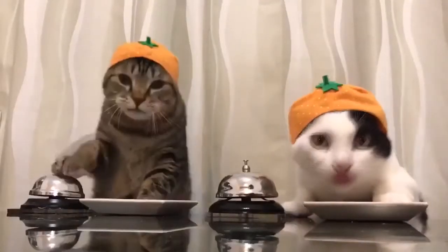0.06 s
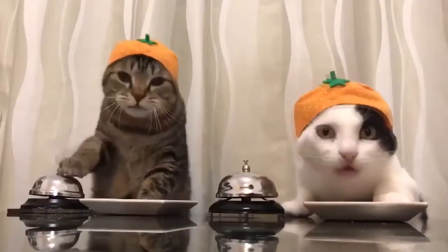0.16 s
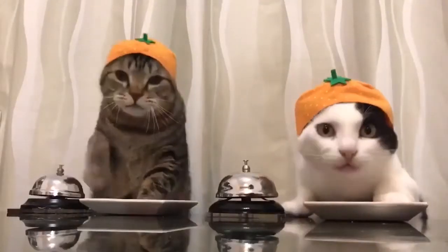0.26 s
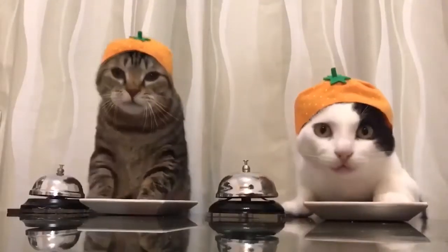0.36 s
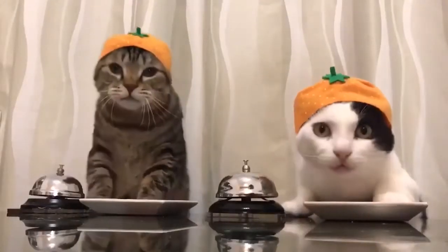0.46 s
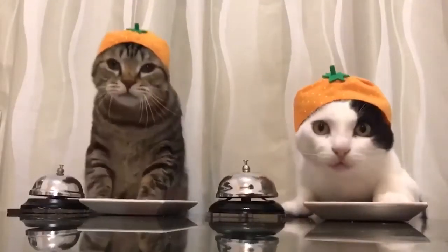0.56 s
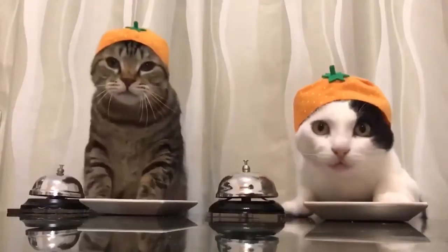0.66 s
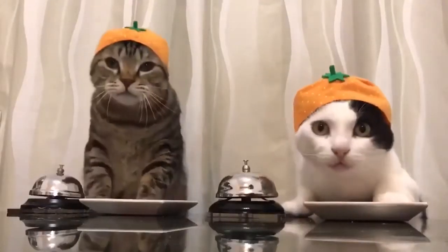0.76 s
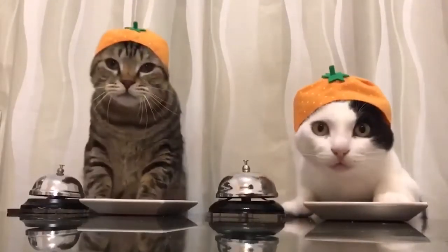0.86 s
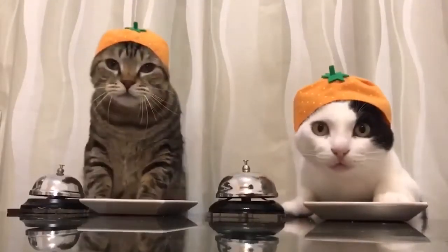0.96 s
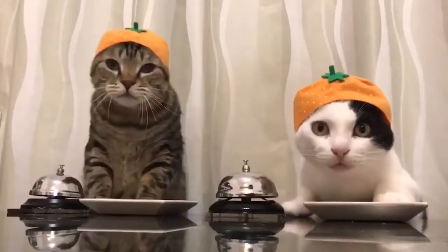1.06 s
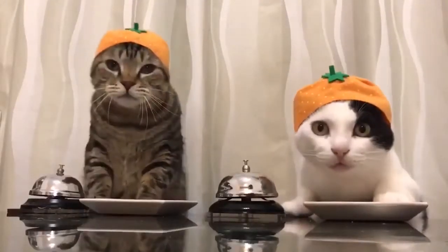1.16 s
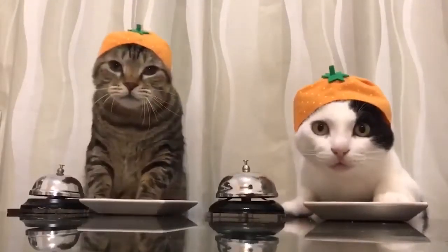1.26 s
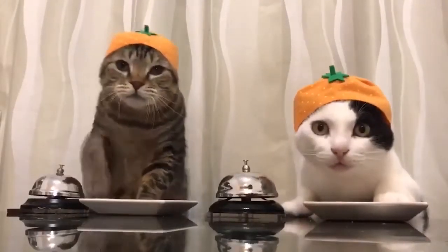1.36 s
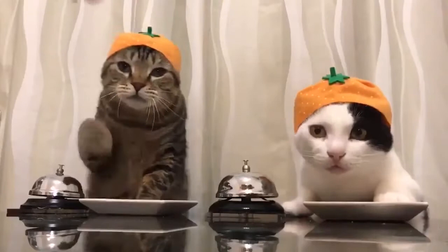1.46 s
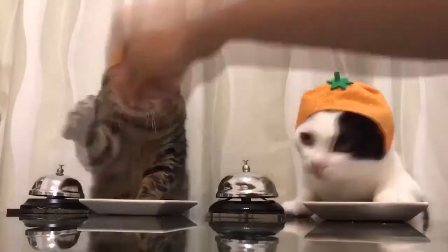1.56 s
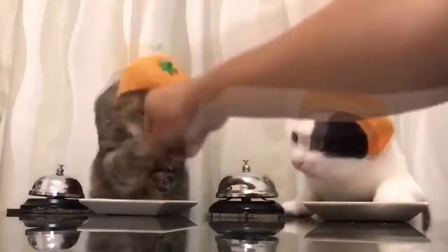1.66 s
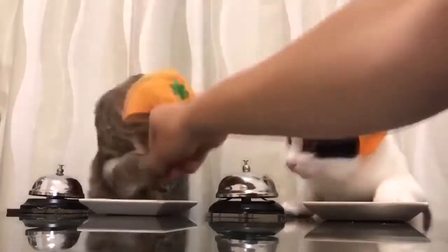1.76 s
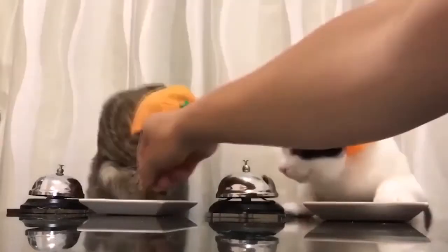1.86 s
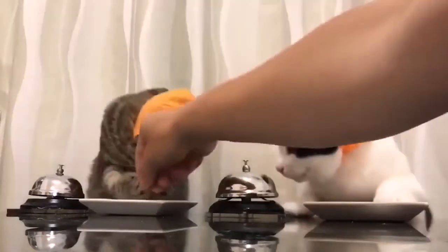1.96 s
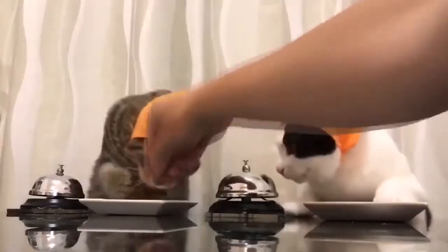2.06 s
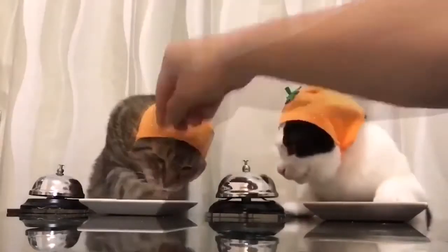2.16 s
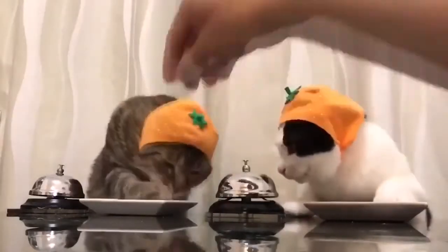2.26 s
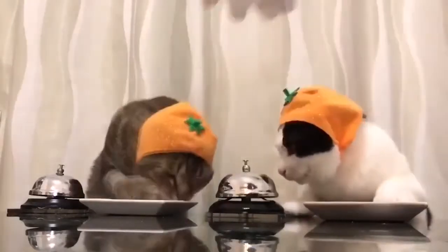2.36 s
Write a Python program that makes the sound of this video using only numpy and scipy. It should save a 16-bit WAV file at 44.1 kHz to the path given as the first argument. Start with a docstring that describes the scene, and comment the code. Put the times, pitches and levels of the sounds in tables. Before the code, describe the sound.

A metal desk bell dings twice under a fumbling paw, then dry pellets tick on china

```python
"""Paw on a desk bell

A paw fumbles at the plunger of a metal desk bell on a table: noise grains ring plunger and base, thuds the table.
The clapper strikes twice, the second blow softer: grains crack on the dome, decaying sines ring in beating pairs.
Later a few dry pellets tick on a china plate and ring its short modes, among soft scuffs of filtered noise.
A quiet room of wavering noise bands lies below.
The sound sits almost wholly in the right channel; the left is nearly silent.
"""
import sys
import numpy as np
from scipy import signal
from scipy.io import wavfile

SR = 44100
rng = np.random.default_rng(int(sys.argv[2]) if len(sys.argv) > 2 else 0)


def waveform_to_disk(signal):
    """Save audio, clipped to [-1, 1], as 16-bit WAV at the path in sys.argv[1]."""
    frames = np.transpose(np.atleast_2d(signal))
    scaled = np.clip(frames, -1, 1) * 32767
    samples = np.round(scaled).astype(np.int16)
    wavfile.write(sys.argv[1], SR, samples)


def to_linear_factor(level_db):
    """Convert decibel levels (scalar or array-like) to linear amplitude factors."""
    exponent = np.asarray(level_db, float) / 20
    return 10 ** exponent


N = 105840  # length of the scene [samples]
TOUCH_SCATTER_DB = 2  # spread of mode strengths from strike to strike

# room tone spectrum: (frequency [Hz], relative density [dB per Hz])
ROOM_SPECTRUM = [(22, -18), (40, 2), (75, 5), (130, -5.5), (300, -11.5), (800, -15.5), (2000, -24.5),
                 (4500, -44), (9000, -37), (16000, -44.5)]
# paw weight thuds the table: (time [s], strike level [dB])
PAW_THUDS = [(.064, -34), (.103, -39), (.127, -40), (.152, -38.5), (.215, -38.5), (.253, -33.5), (.29, -42),
             (.36, -46.5), (.468, -43.5), (.52, -44), (.59, -45), (1.545, -46.5)]
# low modes of the table: (frequency [Hz], relative level [dB], t60 [s])
TABLE_MODES = [(76, -8, .12), (93, 0, 0.12), (125, -6, 0.09), (159, -10, 0.05), (210, -13, 0.2),
               (350, -11, 0.12)]
# soft scuffs near the table: (time [s], level [dB], rise constant [s], time to fall 20 dB [s], centre [Hz])
SCUFFS = [(0.538, -54, 0.0023, 0.0023, 1579), (0.629, -27, 0.0032, 0.0061, 1481),
          (1.113, -61.5, 0.00079, 0.0087, 1800), (1.460, -70, .003, .01, 1593),
          (1.575, -44, 0.0066, 0.025, 1400), (1.581, -62.5, .002, 0.006, 1587),
          (1.587, -46, 0.0023, 0.012, 487), (1.783, -46.5, 0.00092, 0.0066, 817),
          (1.862, -59.5, 0.0011, 0.024, 5000), (2.019, -50, 0.0018, .012, 460),
          (2.136, -57, 0.026, 0.089, 4500), (2.357, -52, 0.0036, 0.09, 515),
          (2.211, -64.5, 0.0055, 0.25, 5830)]
# pellets on the plate: (time [s], ring level [dB], tick level [dB], tilt above the main ring [dB per octave])
PELLET_DROPS = [(2.1981, -28.5, -36, 5), (2.203, -29, -57, -19), (2.209, -36.5, -50, 13),
                (2.295, -47.5, -57, -13), (2.336, -44, -48, -17), (2.369, -40.5, -48, -18)]
# modes of the china plate: (frequency [Hz], relative level [dB], t60 [s])
PLATE_MODES = [(380, -11, .035), (880, -9, .02), (1550, -3, .015), (3700, -8, .008), (4800, 0, .022),
               (6400, -6, .007), (6900, -6, .009)]
# the loose plunger rattles in its sleeve:
# (time [s], level [dB], rise constant [s], time to fall 20 dB [s], tilt about 4 kHz [dB per octave])
PLUNGER_RATTLES = [(.0445, -41, .002, 0.025, 0), (.1290, -30, .0004, 0.009, 2), (.135, -41, .002, .015, 3),
                   (.141, -37, .001, 0.005, 0), (.206, -31, 0.003, .013, 1.4),
                   (.255, -36.5, .008, 0.051, 0.5), (.4200, -29, .0003, 0.005, 1),
                   (.430, -34, .003, .014, 1), (.446, -35, .003, .011, 1), (.459, -34, .003, 0.013, 1),
                   (.5120, -35, .0005, 0.007, 1)]
# broad resonances of plunger and base: (frequency [Hz], width of one filter pass [Hz], relative level [dB])
BASE_RESONANCES = [(200, 120, -13), (394, 220, -12), (800, 500, -9), (1452, 460, 2.7), (2520, 3300, -10),
                   (4200, 150, 0), (4460, 150, -1), (5900, 1800, -5), (9200, 1300, -2), (13200, 2800, -9),
                   (15000, 1500, -12)]
# the clapper cracks and chatters on the dome:
# (time [s], level [dB], rise constant [s], time to fall 20 dB [s], tilt about 4 kHz [dB per octave])
CLAPPER_CRACKS = [(.2272, -27, 0.00033, 0.0072, 1.3), (.2302, -15.5, 0.00017, 0.011, 1.7),
                  (.238, -16.5, 0.0027, 0.017, 1.5), (.410, -32.5, 0.0033, 0.051, 1.5)]
# short-lived dome resonances: (frequency [Hz], width of one filter pass [Hz], relative level [dB])
CRACK_RESONANCES = [(700, 900, -9), (1400, 550, -13), (2870, 3100, -4), (4300, 5500, -4), (5700, 3000, -1),
                    (8474, 840, 4), (9100, 700, -0.5), (10370, 640, 0), (12700, 2400, -14),
                    (13000, 790, -0.5), (14810, 890, -19.5)]
# clapper blows: (time [s], rise constant [s], time the clapper keeps feeding the ring [s], share of free t60 [1])
CLAPPER_BLOWS = [(.2303, .0006, .02, .7), (.412, .015, .07, 1.01)]
# weak modes that the chattering clapper feeds unevenly:
# (frequency [Hz], width [Hz], level after first blow [dB], level after second blow [dB], t60 [s])
UNEVEN_MODES = [(1712, 30, -51, -54, 1.2), (2190, 30, -55, -62, 1.0), (4890, 20, -45, -44, .7)]
# dome modes: (frequency [Hz], sign after first blow [1], sign after second blow [1])
DOME_TONES = [(1123.2, 1, -1), (1162.1, 1, 1), (1740, 1, 1), (3020.1, 1, 1), (3043.5, -1, -1),
              (5610.3, 1, 1), (5640, 1, -1), (6920, 1, 1), (8785.6, 1, 1), (9510, 1, 1), (9541, 1, 1),
              (10600, 1, 1), (10820, 1, 1), (12685.5, 1, 1), (13190, 1, 1), (13410, 1, 1), (13440, 1, 1)]
# the same modes in order: (level after first blow [dB], level after second blow [dB], free t60 [s])
DOME_LEVELS = [(-45, -35.5, 16), (-41, -42.5, 14), (-58.5, -69, 12), (-26, -17.5, 6), (-28, -30.5, 5.4),
               (-13, -19, 2.506), (-16.5, -26.5, 2.22), (-60, -64.5, 10), (-10, -17.5, 0.62),
               (-42, -45, 1.5), (-26.5, -44.5, 0.21), (-55, -69, 8), (-73, -71, 2.5), (-31.5, -41, 0.48),
               (-45, -62, 0.24), (-60.5, -64.5, 1.8), (-61, -60.5, 1.8)]
# an arm reaches between bell and microphone and dulls the ring: (time [s], tilt about 1.8 kHz [dB per octave])
ARM_TILT = [(0.0, 2.5), (1.304, -1.03), (1.701, -2.34), (1.999, -6), (2.4, -9)]
# the clapper rebounds against the dome and chokes the ring for a moment: (time [s], dip [dB])
CHOKES = [(.2368, -14), (.2426, -9)]


def rms_one(x):
    """Scales a signal to an RMS of one."""
    return x / np.sqrt(np.mean(x ** 2) + 1e-20)


def since(s):
    """Seconds since s, zero before."""
    return np.maximum(np.arange(N) / SR - s, 0)


def clicks(times, size):
    """One single-sample click for each time."""
    out = np.full(N, 1e-18)
    np.add.at(out, (np.asarray(times) * SR).astype(int), size)
    return out


def ring(x, hz, t60):
    """A two-pole resonator: a unit click sets a decaying sine of height 1 ringing."""
    r, w = to_linear_factor(-60 / (t60 * SR)), 2 * np.pi * hz / SR
    return signal.lfilter([0, np.sin(w)], [1, -2 * r * np.cos(w), r * r], x)


def band(x, low_hz, high_hz):
    """Butterworth band-pass."""
    return signal.sosfilt(signal.butter(2, [low_hz, min(high_hz, .45 * SR)], "band", fs=SR, output="sos"), x)


def burst(s, rise, length):
    """An exponential swell under a decay that loses 20 dB per length."""
    t = since(s)
    return (1 - np.exp(-t / rise)) * to_linear_factor(-20 * t / length)


def strike(times, strike_db, modes):
    """Clicks ring every mode; strike_db holds one level per strike and mode, scattered a little."""
    strike_db = strike_db + rng.normal(0, TOUCH_SCATTER_DB, strike_db.shape)
    out = np.zeros(N)
    for k, (hz, mode_db, t60) in enumerate(modes):
        out += ring(clicks(times, to_linear_factor(strike_db[:, k] + mode_db)), hz, t60)
    return out


def rattle(events, resonances, per_s, spread_db):
    """Dense uneven metal contacts, as random grains, ring broad resonances."""
    sizes = to_linear_factor(spread_db * np.minimum(rng.exponential(1, N), 4))
    grains = rms_one((rng.random(N) < per_s / SR) * rng.choice([-1, 1], N) * sizes)
    shapes = [burst(s, rise, length) for s, _, rise, length, _ in events]
    out = np.zeros(N)
    for k, (hz, width, mode_db) in enumerate(resonances):
        octaves = np.log2(hz / 4000)
        shape = sum(to_linear_factor(db + tilt * octaves) * e for (_, db, _, _, tilt), e in zip(events, shapes))
        r = np.exp(-np.pi * width / SR)
        b = (1 - r * r) / 2 * np.array([1, 0, -1])
        a = [1, -2 * r * np.cos(2 * np.pi * hz / SR), r * r]
        once = signal.lfilter(b, a, grains * shape + 1e-18)
        twice = signal.lfilter(b, a, once)
        # alternate signs between neighbours; narrow bands are raised to even out their power
        out += (-1) ** k * to_linear_factor(mode_db) * np.sqrt(SR / width / 2) * twice
    return out


def room_tone():
    """Half-octave noise bands, each wavering slowly on its own."""
    level_db, waver_db, wavers_per_s = -56.5, 2.2, 8
    edges = 20 * 2 ** np.arange(0, 9.9, .5)
    white = rng.standard_normal((2, N + SR))
    hz, density_db = np.transpose(ROOM_SPECTRUM)
    out = np.zeros(N)
    for k, (low, high) in enumerate(zip(edges, edges[1:])):
        waver = np.interp(np.arange(N) / SR * wavers_per_s, np.arange(30), rng.standard_normal(30))
        band_db = np.interp(np.log(low * high) / 2, np.log(hz), density_db)
        settled = band(white[k % 2], low, high)[SR:]  # skip the filter's first second
        out += to_linear_factor(band_db + waver_db * waver) * settled
    return to_linear_factor(level_db) * rms_one(out)


def room(x):
    """Diffuse echoes: dying noise, a little dull, starting after 4 ms."""
    t60_s, level_db, wall_hz = 0.3, -7, 8900
    t = np.arange(SR // 2) / SR
    tail = rng.standard_normal(len(t)) * to_linear_factor(-60 * t / t60_s) * (t > .004)
    tail = signal.sosfilt(signal.butter(1, wall_hz, fs=SR, output="sos"), tail)
    tail = tail / np.sqrt(np.sum(tail ** 2))
    return to_linear_factor(level_db) * signal.fftconvolve(x, tail)[:N]


def thuds():
    """Soft pushes ring the low modes of the table."""
    times, db = np.transpose(PAW_THUDS)
    strike_db = np.repeat(db[:, None], len(TABLE_MODES), axis=1)
    return band(strike(times, strike_db, TABLE_MODES), 59, 324)


def scuffs():
    """Short puffs of noise, each in its own band 1.5 octaves wide."""
    white, half = rng.standard_normal(N), 2 ** (1.5 / 2)
    out = np.zeros(N)
    for s, db, rise, length, hz in SCUFFS:
        low, high = hz / half, hz * half
        puff = rms_one(band(band(white, low, high), low, high))
        out += to_linear_factor(db) * burst(s, rise, length) * puff
    return out


def pellets():
    """A slightly dull tick and the short ring of the plate; some pellets wake the upper modes more."""
    main_hz, soft_hz = 4800, 8000
    tick_rise_s, tick_length_s = 0.000436, 0.017
    times, ring_db, tick_db, tilt = np.transpose(PELLET_DROPS)
    shape = sum(to_linear_factor(db) * burst(s, tick_rise_s, tick_length_s) for s, db in zip(times, tick_db))
    tick = band(shape * rng.standard_normal(N), 250, soft_hz)
    octaves_above = np.array([max(np.log2(hz / main_hz), 0) for hz, _, _ in PLATE_MODES])
    strike_db = ring_db[:, None] + tilt[:, None] * octaves_above
    return band(strike(times, strike_db, PLATE_MODES) + tick, 183, soft_hz)


def plunger():
    """Loose metal contacts ring the broad resonances of plunger and base."""
    return rattle(PLUNGER_RATTLES, BASE_RESONANCES, per_s=4000, spread_db=2.5)


def clapper():
    """Denser contacts of clapper on dome ring its short-lived resonances."""
    return rattle(CLAPPER_CRACKS, CRACK_RESONANCES, per_s=9000, spread_db=2)


def weak_modes():
    """Narrow noise bands, heard as wavering tones, swell with each blow and fade."""
    white, out = rng.standard_normal(N), np.zeros(N)
    for hz, width, db1, db2, t60 in UNEVEN_MODES:
        shape = np.zeros(N)
        for (s, rise, _, _), db in zip(CLAPPER_BLOWS, (db1, db2)):
            shape += to_linear_factor(db) * burst(s, rise, t60 / 3)
        out += shape * rms_one(ring(white, hz, np.log(1000) / np.pi / width))
    return out


def dome():
    """Decaying sines start together, one turned round; the second blow resets levels and turns some round."""
    (s1, rise1, hold1, share1), (s2, rise2, hold2, share2) = CLAPPER_BLOWS
    first_touch_s, arm_hz, choke_s = .2268, 1800, .001
    time = np.arange(N) / SR
    arm_tilt = np.interp(time, *np.transpose(ARM_TILT))
    second = 1 - np.exp(-since(s2) / rise2)
    out = np.zeros(N)
    for (hz, sign1, sign2), (db1, db2, t60) in zip(DOME_TONES, DOME_LEVELS):
        old = sign1 * to_linear_factor(db1 - 60 * since(s1 + hold1) / (t60 * share1))
        new = sign2 * to_linear_factor(db2 - 60 * since(s2 + hold2) / (t60 * share2))
        level = old * (1 - second) + new * second
        arm = to_linear_factor(arm_tilt * np.log2(hz / arm_hz))
        out += level * arm * np.sin(2 * np.pi * hz * since(first_touch_s))
    for s, dip_db in CHOKES:
        out *= to_linear_factor(dip_db * np.exp(-((time - s) / choke_s) ** 2))
    return out * (1 - np.exp(-since(s1) / rise1))


def scene():
    """Mixes all layers into the right channel; knocks and plate, the plate 9 dB lower, feed the room."""
    knocks = plunger() + clapper() + scuffs()
    plate = pellets()
    echoes = room(knocks + to_linear_factor(-9) * plate)
    bell = dome() + weak_modes()
    right = room_tone() + echoes + thuds() + plate + knocks + bell
    return np.array([np.zeros(N), right])


def band_limit(x):
    """A steep low-pass at the top of the band."""
    return signal.sosfilt(signal.butter(12, 15980, fs=SR, output="sos"), x)


def record(dry):
    """Peaks beyond full scale are clipped."""
    mix = np.clip(dry, -1, 1)
    return band_limit(mix)


dry = scene()
out = record(dry)
waveform_to_disk(out)
```